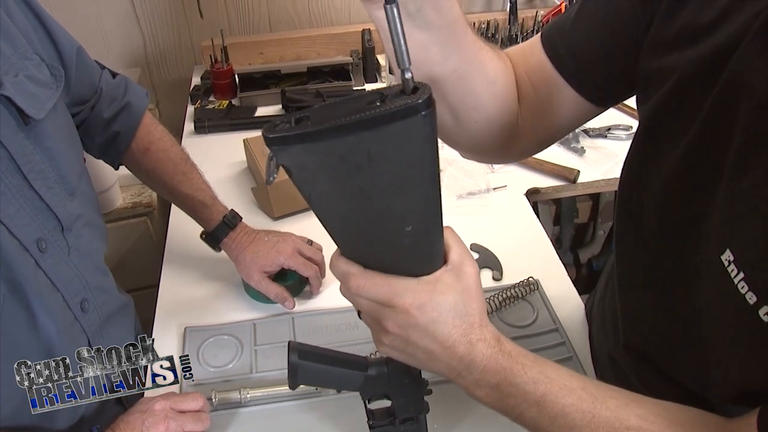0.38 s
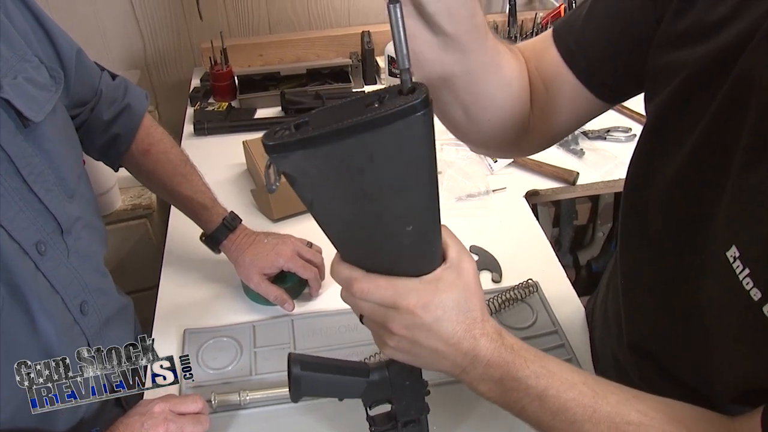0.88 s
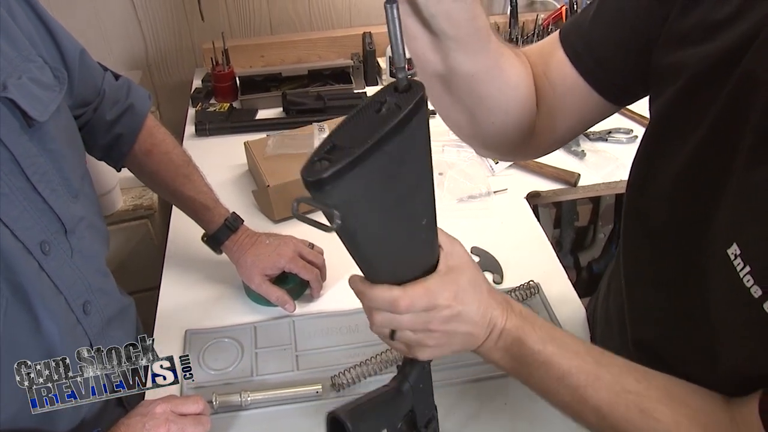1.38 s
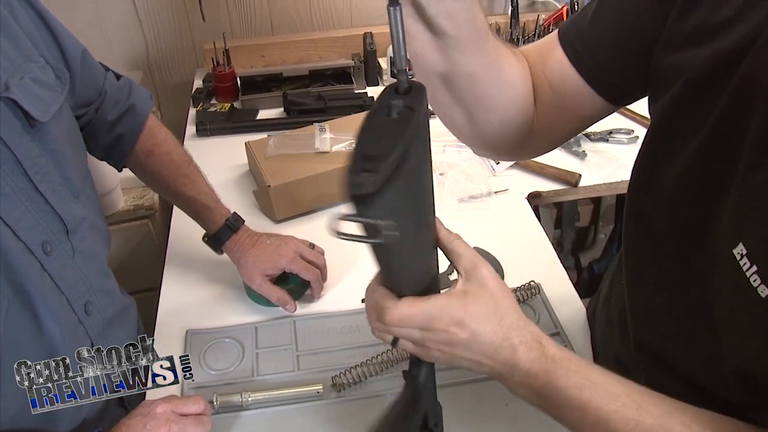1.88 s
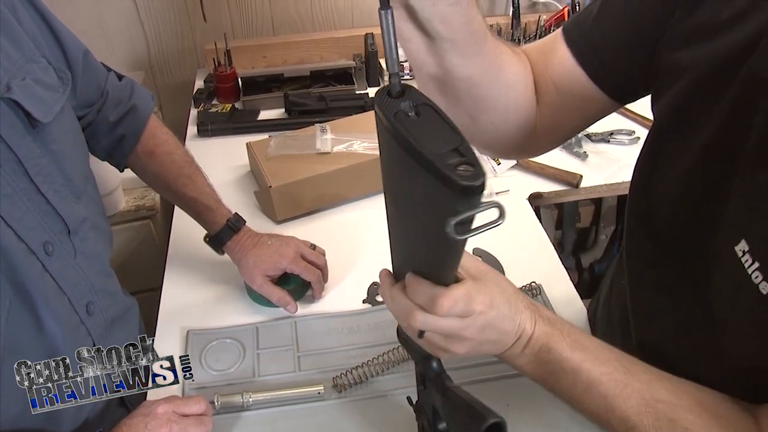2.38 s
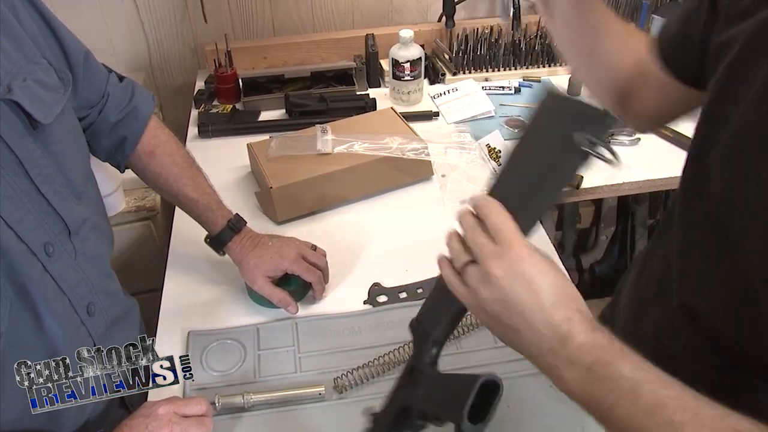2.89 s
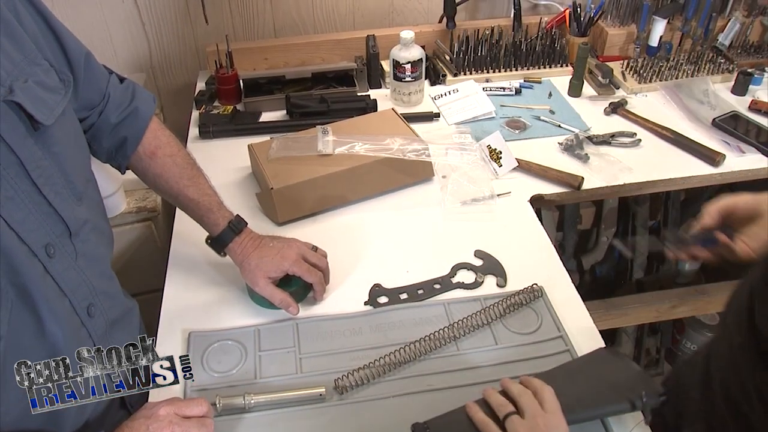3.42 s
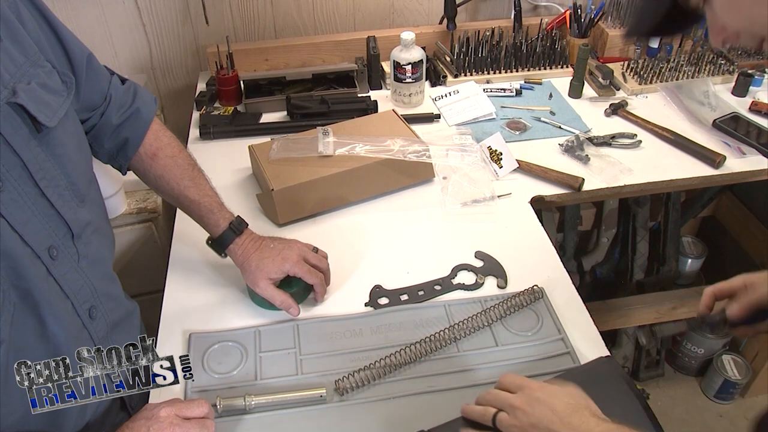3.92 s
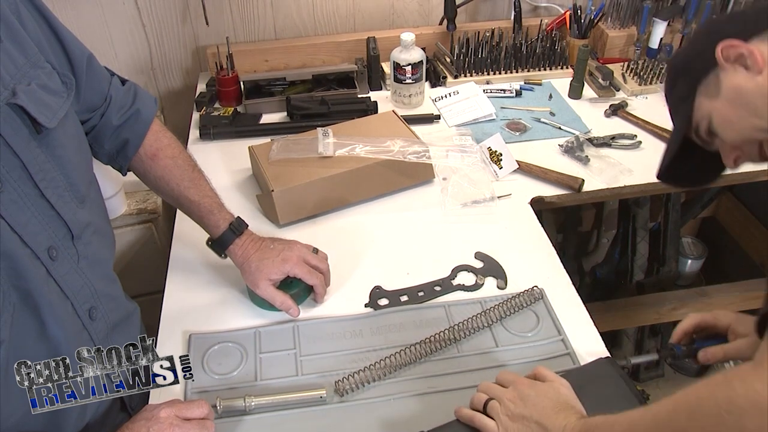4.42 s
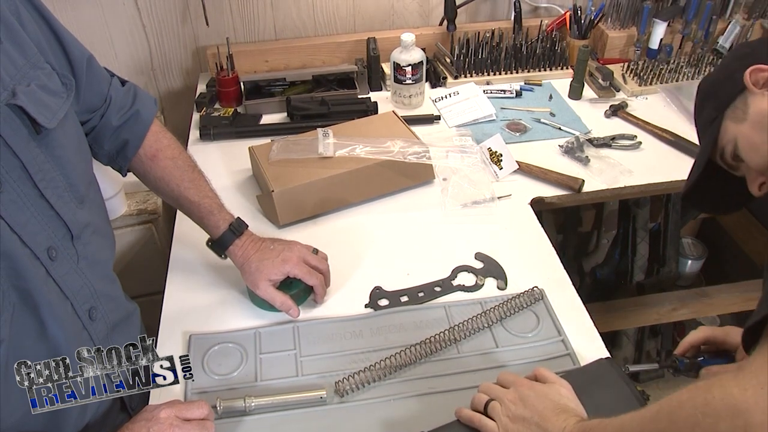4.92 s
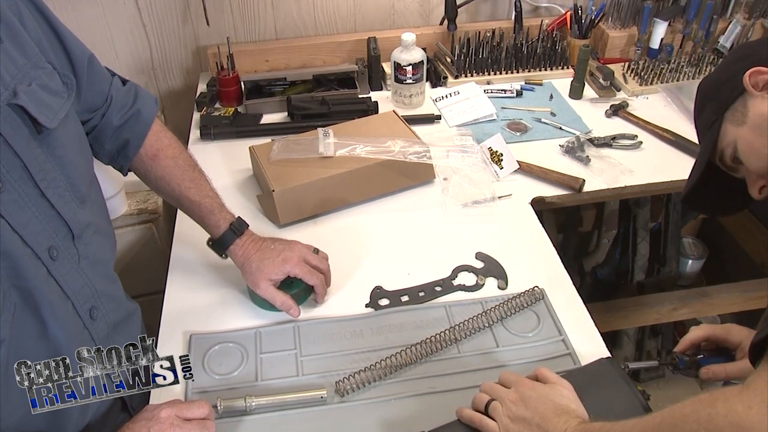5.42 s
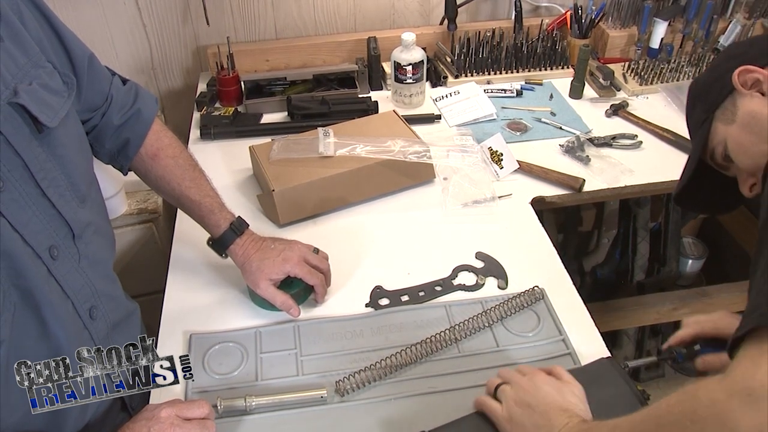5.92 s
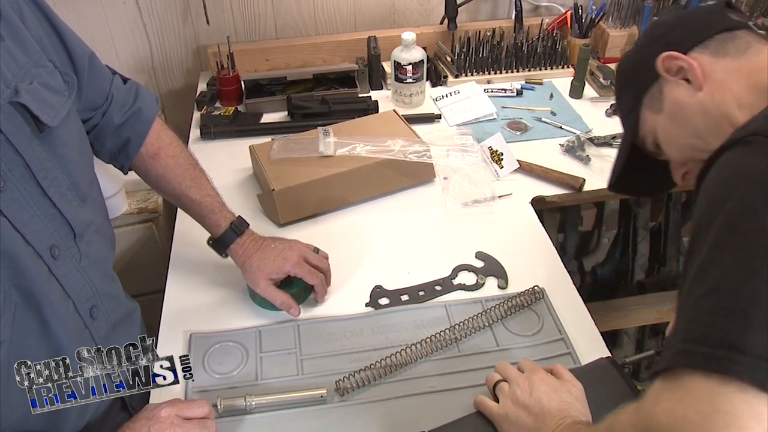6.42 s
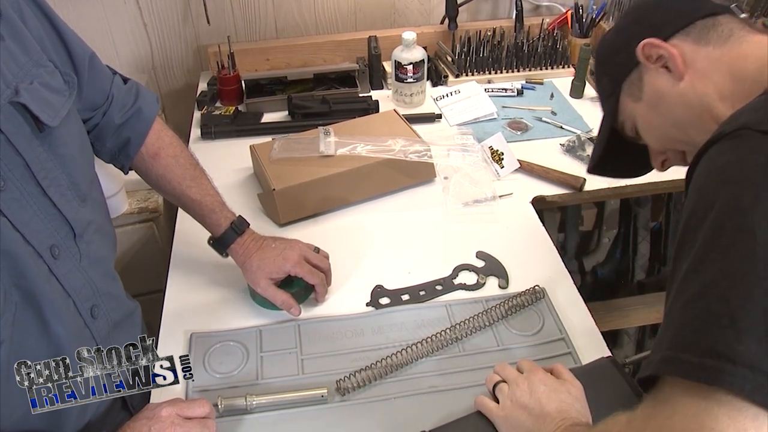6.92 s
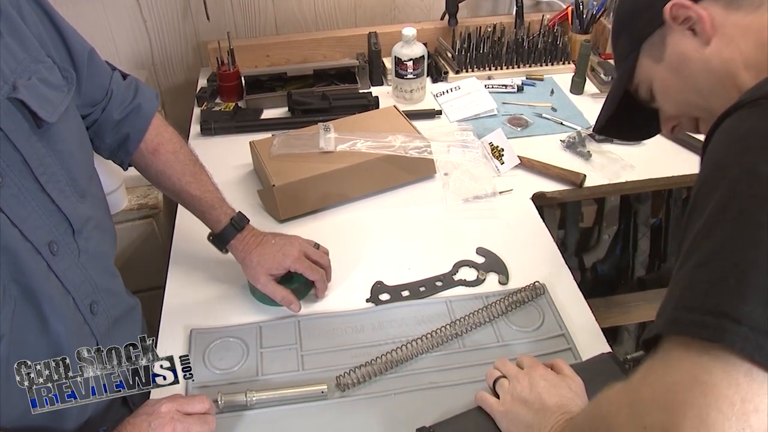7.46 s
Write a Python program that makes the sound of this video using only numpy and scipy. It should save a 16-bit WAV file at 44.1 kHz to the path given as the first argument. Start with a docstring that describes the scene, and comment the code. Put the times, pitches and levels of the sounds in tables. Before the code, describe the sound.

Faint fan drone and cloth rustle, a sharp metallic click, two hard rattling knocks on a bench, a short scrape, then light ticks.

```python
"""Air noise, a wavering fan drone (band-passed noise) and faint electronic sines fill a quiet workshop throughout.
A rifle is turned in the hand: skin and cloth rub as flickering noise, steel parts click as filtered grit, and
a screwdriver slips with a modal ring. Set down on a wooden bench, it gives two knocks from bench modes, with
rattling taps and a ringing tube. The stock then scrapes over a mat as grainy noise; gliding sines squeak,
lesser clicks and knocks follow, and a screw rasps twice as narrow-band noise."""
import sys
import numpy as np
from scipy import signal
from scipy.fft import rfft, irfft, next_fast_len
from scipy.io import wavfile
from scipy.ndimage import uniform_filter1d

SR = 44100
rng = np.random.default_rng(int(sys.argv[2]) if len(sys.argv) > 2 else 0)


def field_ratio(decibels):
    """Amplitude ratio for a level in dB (20 dB per decade); scalars and array-likes work."""
    return 10 ** (np.asarray(decibels, dtype=float) / 20)


def bounce(signal):
    """Save signal as a 16-bit WAV file at the path given by the first command-line argument."""
    frames = np.transpose(np.atleast_2d(signal))
    limited = np.clip(frames, -1, 1)
    pcm = np.round(limited * 32767).astype(np.int16)
    wavfile.write(sys.argv[1], SR, pcm)


N = 333837

# smooth air noise: (frequency [Hz], relative spectral level [dB per Hz])
AIR_SPECTRUM = [(20, -31), (40, -2.5), (60, -3), (130, -10.5), (229, -8.5), (317, -18), (384, -11),
                (531, -12.5), (695, -19.5), (1020, -21), (1440, -25), (2220, -44), (5000, -38),
                (16000, -44)]
# fan loudness before its wavering: (time [s], level [dB])
FAN_LEVEL = [(0, -58.5), (1.2, -61), (2.4, -58.5), (3.3, -60.5), (4.2, -60.5), (5.5, -66.5), (6.5, -65),
             (7.57, -63)]
# fan resonances: (centre [Hz], width [Hz], relative level [dB])
FAN_BANDS = [(183.3, 49, -6.5), (480, 17, -15)]
# steady tones of electronics: (frequency [Hz], rms level [dB])
WHINES = [(4000, -91), (6002, -90.5), (8000, -100), (11999, -101), (14002, -99), (15735, -106)]
# hands and cloth rubbing, before the flicker: (time [s], treble level [dB])
RUB_LEVEL = [(0.0, -82), (0.34, -78.5), (0.59, -82), (1.33, -86), (1.54, -73), (1.95, -69), (2.23, -75.5),
             (2.5, -73.5), (2.664, -70), (2.826, -82), (3.07, -62.5), (3.242, -70.5), (3.38, -77.5),
             (4.96, -81), (5.15, -79), (5.4, -82), (5.84, -85), (5.9, -70.5), (6.03, -71.5), (6.1, -77),
             (6.42, -71.5), (6.86, -73.5), (7.2, -79.5), (7.57, -77)]
# dull and bright bands of the rubbing: (centre [Hz], width [Hz], relative level [dB])
RUB_LOW = [(840, 390, 14.5), (1665, 1140, 12.5), (2340, 590, -25), (3210, 1300, -3.5)]
RUB_HIGH = [(4300, 4100, 21), (5280, 4500, 0), (6500, 1200, -8), (11500, 2000, -6)]
# steel and plastic parts meeting:
# (time [s], direct peak [dB], centre [Hz], tilt at 5.5 kHz [dB], tilt at 11 kHz [dB])
CLICKS = [(1.5613, -50, 1160, 0, -16), (1.5838, -46, 2100, 12, 10), (2.5392, -41.5, 990, 3, 0),
          (2.623, -51, 1210, -8, -10), (2.656, -46, 2250, 8, -16), (2.6683, -18, 2090, -2.5, -5.5),
          (2.9812, -44.5, 2050, -4, -19), (3.4174, -28.5, 1240, -19, -24), (3.4231, -20, 1180, 3, -18),
          (3.4312, -26, 1000, -9, -9), (3.4381, -19, 920, -13, -19), (3.4444, -21, 1240, 1, -17),
          (3.4515, -19, 1170, -14, -32), (3.4608, -19, 1770, -1, -36), (3.477, -29, 1040, -3, -30),
          (3.6433, -29, 1184, -1, -11), (3.6551, -29.5, 2490, 9, -20), (3.6637, -33.5, 1030, -14, -15),
          (3.7343, -27, 2580, 3, -18), (3.7881, -18.5, 2300, -3, -27), (3.7973, -22.5, 2300, 3, -24),
          (3.808, -29, 1590, -9.5, -9), (3.8155, -30, 932, 3, -21), (3.821, -10, 2400, 4.5, -15.5),
          (3.828, -21, 2210, -8, -23), (3.8357, -24, 1300, -14, -19), (3.8485, -17.5, 1200, -2.5, -23),
          (3.8586, -19.5, 2250, -4, -12), (4.5884, -46, 1830, -11, -13), (4.928, -49, 1350, -31, -16),
          (4.9597, -51, 1430, -10, -16), (4.9978, -29.5, 2170, -3.5, -16), (5.148, -44, 1730, -4, -16),
          (5.153, -41, 1900, -8, -16), (5.1699, -32, 1620, -4.5, -8), (5.209, -39.5, 1490, -16, -21),
          (5.279, -41.5, 1760, -14, -19), (5.599, -26.5, 1620, 12.5, 1), (5.7281, -40, 1440, -12, -19),
          (5.884, -52, 1750, 10, -10), (5.9018, -53, 1730, 5, -10), (6.224, -41, 3300, 16, -25),
          (6.232, -51.5, 3330, 11, -25), (6.787, -46, 2270, -10, -12), (6.796, -47, 1500, -8, -12),
          (6.804, -45, 2430, -1, -1), (7.018, -46, 2500, 0, -16), (7.0242, -41.5, 1800, -9, -18),
          (7.033, -48.5, 2500, -12, -16), (7.41, -53.5, 934, 4, -2), (7.482, -40.5, 2260, -6, -16)]
# broad resonances of the parts, damped by the hands: (centre [Hz], width [Hz], relative level [dB])
PARTS = [(1000, 1400, 5.5), (1510, 350, 3.5), (1620, 320, 0), (2250, 620, 2.5), (2880, 640, -2),
         (3150, 610, -20.5), (4370, 1170, -2), (5270, 950, -8.5), (7170, 2150, -7.5), (9900, 1100, -13.5),
         (12000, 2200, -13)]
# modes of the screwdriver shank: (frequency [Hz], relative level [dB], t60 [s])
DRIVER_MODES = [(1604, -3, .06), (2245, -3, .3), (2331, 0, .2), (3250, -12, .1), (4950, -12, .2),
                (5200, -13, .12)]
# the shank slips off the screw: (time [s], peak before the grip breaks it up [dB])
DRIVER_BLOWS = [(2.656, -52), (2.6685, -36)]
# weight landing on the bench top: (time [s], ring peak [dB], centre [Hz], slap relative to ring [dB])
KNOCKS = [(3.417, -13.5, 220, -11), (3.424, -27, 90, 2), (3.432, -24.5, 170, -7), (3.437, -48, 463, -17),
          (3.4457, -24, 261, 7), (3.715, -30, 170, -9.5), (3.727, -31.5, 90, -20), (3.742, -43, 170, -4),
          (3.77, -34, 114, -11), (3.786, -23.5, 205, -23), (3.816, -18, 270, -3), (4.157, -47.5, 263, -2),
          (5.17, -44, 230, -11), (5.189, -44, 127, -8), (5.318, -47, 93, -20), (6.8, -44.5, 262, -12),
          (7.025, -44, 288, -9), (7.491, -50, 282, -11)]
# nominal modes of the bench top: (frequency [Hz], relative level [dB], t60 [s])
BENCH_MODES = [(70.4, -8, 0.13), (98.5, 3, 0.048), (170, -1.5, 0.031), (205, -1, 0.026),
               (264.6, 7.5, 0.025), (345, 1, 0.045), (424, 3, 0.053), (608, 2, 0.13), (707, 12.5, 0.024),
               (870, -1, 0.024), (990, -20, 0.016), (1280, -25, .02)]
# loose parts chatter while the weight settles: (start [s], length [s], starting level [dB])
RATTLES = [(3.426, 0.032, -26.5), (3.787, 0.016, -40.5), (3.818, 0.048, -30.5)]
# colour of the chatter: (frequency [Hz], relative spectral level [dB per Hz])
RATTLE_SPECTRUM = [(88, -18), (150, -4), (300, -12.5), (742, -5), (850, -10.5), (1250, -4.5), (1870, -22),
                   (2500, -11.5), (3210, -26), (5300, -25), (15000, -60)]
# modes of a loose metal tube: (frequency [Hz], relative level [dB], t60 [s])
TUBE_MODES = [(3775, -2, .35), (3941, -8, .25), (5055, -8, .16), (6158, 0, .22), (7052, -5, .15),
              (8200, -9, .15), (9550, -9, .09), (14500, -19, .09)]
# the first knock jars the tube: (time [s], peak before the grip breaks it up [dB])
TUBE_BLOWS = [(3.432, -45), (3.461, -42.5)]
# the stock slides over the mat, before the grain: (time [s], low level [dB], treble level [dB])
SLIDE_LEVELS = [(4.03, -73, -73), (4.08, -63.5, -71), (4.172, -53.5, -63.5), (4.214, -56, -69),
                (4.262, -52, -52.5), (4.342, -51, -51.5), (4.442, -51.5, -61.5), (4.516, -52, -61.5),
                (4.54, -59.5, -68), (4.66, -68, -88)]
# dull and bright bands of the slide: (centre [Hz], width [Hz], relative level [dB])
SLIDE_LOW = [(880, 980, 3), (1680, 1150, 0.5), (2400, 580, -11)]
SLIDE_HIGH = [(3030, 560, 8), (4200, 1700, 0.5), (5300, 1200, -0.5), (6600, 1600, -8), (11000, 6500, -27)]
# pitched squeaks and pips of handling: (time [s], peak [dB], start [Hz], end [Hz], length [ms])
SQUEAKS = [(4.166, -52, 1340, 1290, 28), (4.175, -53, 2410, 2320, 22), (4.261, -49, 3090, 3120, 30),
           (5.215, -61, 4700, 4600, 20), (6.628, -47, 880, 900, 5), (7.355, -63, 3660, 3700, 34)]
# a screw turning in its thread, before the flicker: (start [s], length [s], level [dB])
SCREW_TURNS = [(6.558, .02, -61.5), (7.136, 0.092, -68)]
# its narrow resonance: (centre [Hz], width [Hz], relative level [dB])
SCREW_BAND = [(2340, 460, 0)]
# diffuse tail: (band centre [Hz], t60 [s], level against the direct sound [dB])
ROOM = [(116, 0.25, -16.5), (435, 0.28, -13), (1140, 0.62, -19.5), (3000, 0.45, -16.5), (7200, 0.56, -13)]
# reflections from nearby walls and bench: (delay [ms], level [dB])
ECHOES = [(2.3, -26.5), (3.7, -12.5), (5.9, -15), (8.1, -17), (11, -14.5)]

AIR_DB = -57.5
RUB_STEADY_DB, RUB_LOW_OVER_TREBLE_DB = -67, 5  # the dull band: a steady part plus one that follows the treble
CONTACT_MS, CONTACT_SCATTER = 1.31, 0.2  # median for firm touches; log-normal spread
SOFT_BELOW_DB, SOFT_MS_PER_DB = -36, 0.13  # faint touches are softer and last longer
MID_DB, MID_FOLLOWS_TREBLE = 2, 0.23  # click tilt at 3 kHz: offset, share of the 5.5 kHz tilt
PUSH_MS = 1.45
RATTLE_RISE_DB_PER_S, RATTLE_SAG_DB_PER_S, RATTLE_FALL_DB_PER_S = 2400, 108, 2598
SLIDE_FULL_DB = -50.5  # low level that counts as full pressure
HOLLOW_HZ, HOLLOW_WANDER, HOLLOW_WIDTH_HZ = 1665, 0.05, 850
HOLLOW_DB, HOLLOW_DB_PER_DB = -51, 3  # level at full pressure; slope against the low slide level
SCREW_RISE_DB_PER_S, SCREW_FALL_DB_PER_S = 158, 230
MIC_LOW_HZ = 67.6


def unit(x):
    """Normalization: scale to rms 1."""
    return x / np.sqrt(np.mean(x ** 2))


def to_peak(x, db):
    """Normalization: scale to a peak of db."""
    return x * field_ratio(db) / np.abs(x).max()


def shaped(x, gain):
    """Zero-phase filtering: multiply the spectrum by a gain given as a function of frequency."""
    size = next_fast_len(len(x))
    hz = np.arange(size // 2 + 1) * SR / size + 1e-3
    return irfft(rfft(x, size) * gain(hz), size)[:len(x)]


def spectrum_gain(rows, f):
    """Spectral envelope: a (Hz, dB) table interpolated over log frequency."""
    hz, db = np.transpose(rows)
    return field_ratio(np.interp(np.log(f), np.log(hz), db))


def peaks_gain(peaks, f):
    """Resonance: sum of band-pass gains, each a simple resonance applied twice."""
    return sum(field_ratio(db) / (1 + ((f - hz * hz / f) / width) ** 2) for hz, width, db in peaks)


def resonant_noise(peaks):
    """Resonant filtering of white noise, scaled to rms 1."""
    return unit(shaped(rng.standard_normal(N), lambda f: peaks_gain(peaks, f)))


def walk(rate):
    """Slow random modulation: levels held 1 / rate s and slewed twice, spread near 1."""
    hold = int(SR / rate)
    steps = np.repeat(rng.standard_normal(N // hold + 1), hold)
    return 0.62 * uniform_filter1d(uniform_filter1d(steps, hold), hold)[:N]


def curve(rows, outside=None):
    """Linear interpolation of a (s, value) table at every sample; outside replaces the held end values."""
    s, value = np.transpose(rows)
    return np.interp(np.arange(N) / SR, s, value, outside, outside)


def burst(s, length, db, rise, sag, fall):
    """Exponential envelope: climbs to db at s, sags for length s, then drops; slopes in dB per s."""
    t = np.arange(N) / SR - s
    return field_ratio(db - rise * np.maximum(-t, 0) - sag * np.clip(t, 0, length) - fall * np.maximum(t - length, 0))


def ring(modes, weight_db, detune):
    """Modal superposition: damped sines, each weighted by how hard it is driven."""
    hz, db, t60 = np.transpose(modes)[:, :, None]
    t = np.arange(SR // 4) / SR
    sines = np.sin(2 * np.pi * hz * detune[:, None] * t)
    decay = np.exp(-np.log(1000) * t / np.clip(t60, .005, 1))
    return (field_ratio(db + weight_db[:, None]) * sines * decay).sum(axis=0)


def steel(modes, blows):
    """Modal ringing of bare metal, its thin rings broken up by the grip."""
    out = np.zeros(N)
    for s, db in blows:
        sound = ring(modes, 1.1 * rng.standard_normal(len(modes)), np.ones(len(modes)))
        onset = 1 - np.exp(-np.arange(len(sound)) / 40)
        add(out, s, to_peak(sound * onset, db))
    return out * field_ratio(4.5 * walk(140))


def add(out, s, sound):
    """Superposition: mix a sound in from time s."""
    i = int(s * SR)
    out[..., i:i + sound.shape[-1]] += sound[..., :N - i]


def air():
    """Broadband noise: white noise given a smooth spectral envelope."""
    noise = rng.standard_normal(N)
    return field_ratio(AIR_DB) * unit(shaped(noise, lambda f: spectrum_gain(AIR_SPECTRUM, f)))


def fan():
    """Amplitude modulation: the drone is resonant noise whose level wavers slowly."""
    return field_ratio(curve(FAN_LEVEL) + 6.1 * walk(3.214)) * resonant_noise(FAN_BANDS)


def whines():
    """Pure tones: electronics sound as steady sines."""
    t = np.arange(N) / SR
    return sum(np.sqrt(2) * field_ratio(db) * np.sin(2 * np.pi * hz * t) for hz, db in WHINES)


def rub():
    """Friction: skin and cloth slip in fine grains, so the hiss flickers."""
    high = field_ratio(curve(RUB_LEVEL))
    low = np.hypot(field_ratio(RUB_STEADY_DB), high * field_ratio(RUB_LOW_OVER_TREBLE_DB))
    grain_db = 1.5 * walk(200) + 1.6 * walk(40)  # shared by both bands
    dull = low * field_ratio(grain_db + 0.52 * walk(13)) * resonant_noise(RUB_LOW)
    bright = high * field_ratio(grain_db + 1.2 * walk(46)) * resonant_noise(RUB_HIGH)
    return dull + bright


def clicks():
    """Impact excitation: gritty contact drives part resonances; row 0 is direct, row 1 feeds the room."""
    out = np.zeros((2, N))
    lead = SR // 250  # space for the zero-phase filter to ring ahead of contact
    t = np.maximum(np.arange(SR // 25) - lead, 0) / SR
    for s, db, centre_hz, treble_db, top_db in CLICKS:
        ms = CONTACT_MS + SOFT_MS_PER_DB * max(SOFT_BELOW_DB - db, 0)
        ms *= np.exp(CONTACT_SCATTER * rng.standard_normal())
        u = t * 1000 / np.clip(ms, .2, 8)
        force = rng.standard_normal(len(t)) * u ** 1.47 * np.exp(-1.4 * u)
        # small parts radiate little bass; a harder edge gives more treble
        mid_db = MID_DB + MID_FOLLOWS_TREBLE * treble_db
        tilt = [(300, -12), (1000, 0), (3000, mid_db), (5500, treble_db), (11000, top_db)]

        def gain(f):
            """Resonance: the part's spectrum, tilted and raised near the click's centre."""
            near_centre_db = 7.5 * np.exp(-(np.log2(f / centre_hz) / 0.33) ** 2)
            return peaks_gain(PARTS, f) * spectrum_gain(tilt, f) * field_ratio(near_centre_db)

        direct = to_peak(shaped(force, gain), db)
        # summed over all directions the grit evens out and only the colour of the part is left
        impulse = 1. * (np.arange(len(t)) == lead + SR // 1000)
        around = unit(shaped(impulse, gain)) * np.std(direct)
        add(out, s - lead / SR, np.array([direct, around]))
    return out


def screwdriver():
    """Free vibration: the shank rings on after slipping off the screw."""
    return steel(DRIVER_MODES, DRIVER_BLOWS)


def knocks():
    """Modal excitation: a smooth push sets the bench top ringing and is itself heard as a slap."""
    out, hz = np.zeros(N), np.array(BENCH_MODES)[:, 0]
    push = np.hanning(int(PUSH_MS * SR / 1000) + 2)
    for s, db, centre_hz, slap_db in KNOCKS:
        chance = rng.standard_normal((2, len(hz)))
        weight_db = 16.5 * np.exp(-(np.log2(hz / centre_hz) / .5) ** 2) + 1.1 * chance[0]
        swing = ring(BENCH_MODES, weight_db, 1 + 0.023 * chance[1])
        swing = swing * (1 - np.exp(-np.arange(len(swing)) / SR / 0.00096))  # gradual onset
        add(out, s, to_peak(signal.fftconvolve(swing, push), db))
        add(out, s, to_peak(-push, db + slap_db))
    return out


def rattles():
    """Dense random impacts: taps of uneven size, coloured by the bench and the parts."""
    taps = rng.standard_normal(N) * field_ratio(1.9 * walk(500))
    chatter = unit(shaped(taps, lambda f: spectrum_gain(RATTLE_SPECTRUM, f)))
    slopes = RATTLE_RISE_DB_PER_S, RATTLE_SAG_DB_PER_S, RATTLE_FALL_DB_PER_S
    return chatter * sum(burst(*row, *slopes) for row in RATTLES)


def tube():
    """Free vibration: the loose metal tube rings on after being jarred."""
    return steel(TUBE_MODES, TUBE_BLOWS)


def slide():
    """Friction: the stock scrapes over the mat in uneven grains; its hollow adds a wandering band."""
    # silent outside the table
    low, high = (field_ratio(curve([(row[0], row[column]) for row in SLIDE_LEVELS], -140)) for column in (1, 2))
    grain = field_ratio(2.2 * walk(200) + 2.6 * walk(50))
    scrape = grain * (low * resonant_noise(SLIDE_LOW) + high * resonant_noise(SLIDE_HIGH))
    # harder pressure wakes the hollow
    hollow = field_ratio(HOLLOW_DB + 2.5 * walk(40)) * (low / field_ratio(SLIDE_FULL_DB)) ** HOLLOW_DB_PER_DB
    # slow noise carried on the moving resonance
    k = int(SR / HOLLOW_WIDTH_HZ)
    slow = uniform_filter1d(uniform_filter1d(rng.standard_normal((2, N)), k), k)
    phase = 2 * np.pi * np.cumsum(HOLLOW_HZ * (1 + HOLLOW_WANDER * walk(9.5))) / SR
    band = unit(slow[0] * np.cos(phase) + slow[1] * np.sin(phase))
    return scrape + hollow * band


def squeaks():
    """Frequency modulation: short gliding tones, roughened by random amplitude."""
    out = np.zeros(N)
    for s, db, start_hz, end_hz, ms in SQUEAKS:
        size = int(ms * SR / 1000)
        tone = np.sin(2 * np.pi * np.cumsum(np.linspace(start_hz, end_hz, size)) / SR)
        rough = 1 + 3.5 * uniform_filter1d(rng.standard_normal(size), size=40)
        add(out, s, to_peak(tone * rough * np.hanning(size), db))
    return out


def screw():
    """Friction with resonance: a screw turning in its thread rasps in one narrow band."""
    turns = sum(burst(*row, SCREW_RISE_DB_PER_S, 0, SCREW_FALL_DB_PER_S) for row in SCREW_TURNS)
    return field_ratio(3.5 * walk(53)) * resonant_noise(SCREW_BAND) * turns


def room(direct, around):
    """Reverberation: a few early echoes and a diffuse tail that dies away band by band."""
    t = np.arange(SR * 3 // 4) / SR
    tail = np.zeros(len(t))
    for hz, t60, db in ROOM:
        band = shaped(rng.standard_normal(len(t)), lambda f: np.exp(-np.log2(f / hz) ** 2))
        build_up = 1 - np.exp(-t / (0.0005 + 0.56 / hz))  # the bass builds up late
        band = band * np.exp(-np.log(1000) * t / t60) * build_up
        tail += field_ratio(db) * band / np.sqrt(np.sum(band ** 2))
    out = direct + signal.fftconvolve(around, tail)[:N]
    for ms, db in ECHOES:
        add(out, ms / 1000, field_ratio(db) * direct)
    return out


def scene():
    """Superposition: hits and squeaks in the room over friction and the steady floor."""
    floor = air() + fan() + whines()
    direct, around = clicks() + screwdriver() + knocks() + rattles() + tube() + squeaks()
    return (floor + rub() + room(direct, around) + slide() + screw())[None]


def top_cut(x):
    """Nothing passes above the cut-off."""
    return signal.sosfilt(signal.butter(12, 16540, fs=SR, output="sos"), x)


def record(dry):
    """High-pass filtering: the microphone drops the deep bass."""
    high_pass = signal.butter(3, MIC_LOW_HZ, "high", fs=SR, output="sos")
    return top_cut(signal.sosfilt(high_pass, dry))


dry = scene()
out = record(dry)
bounce(out)
```